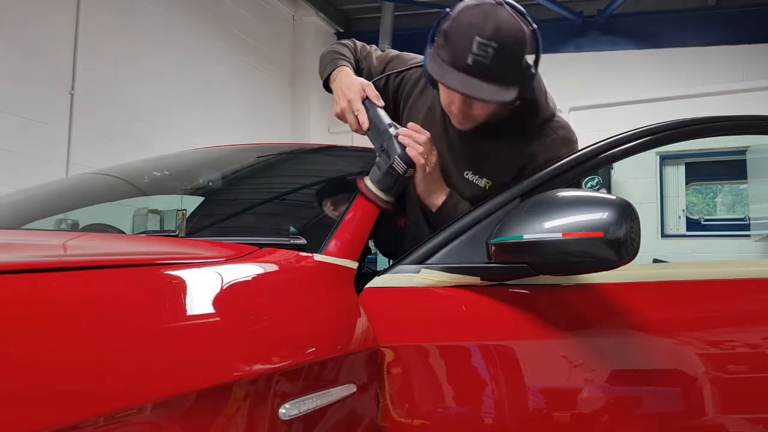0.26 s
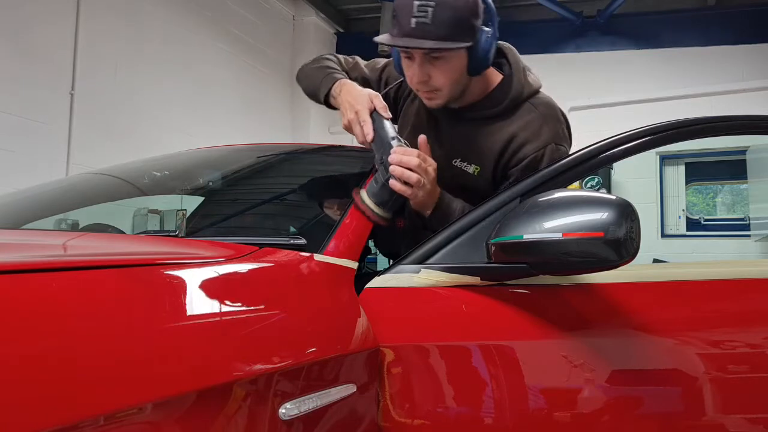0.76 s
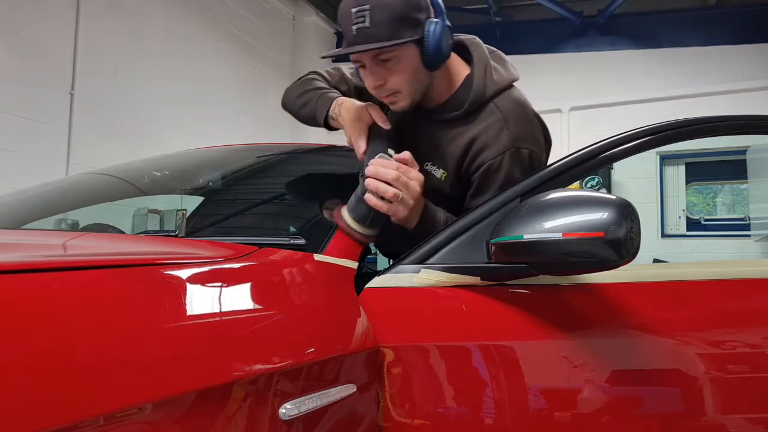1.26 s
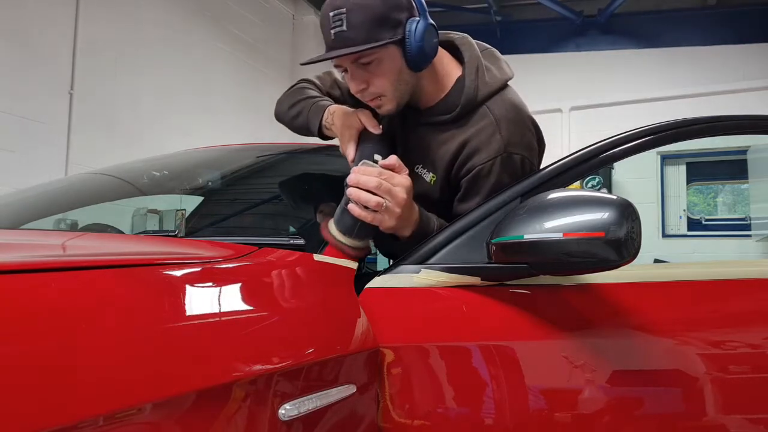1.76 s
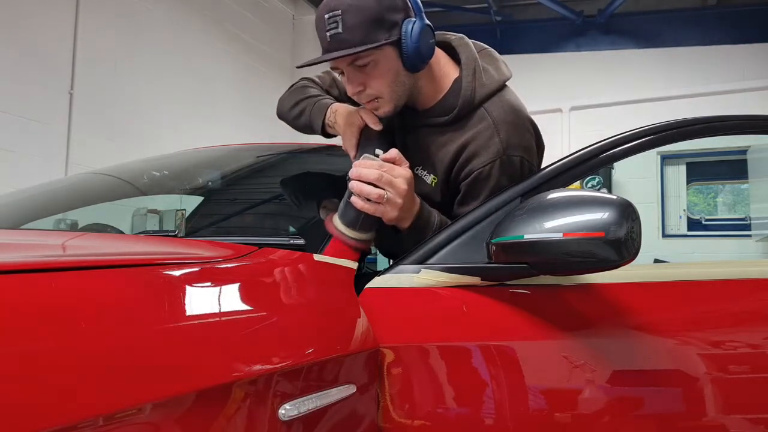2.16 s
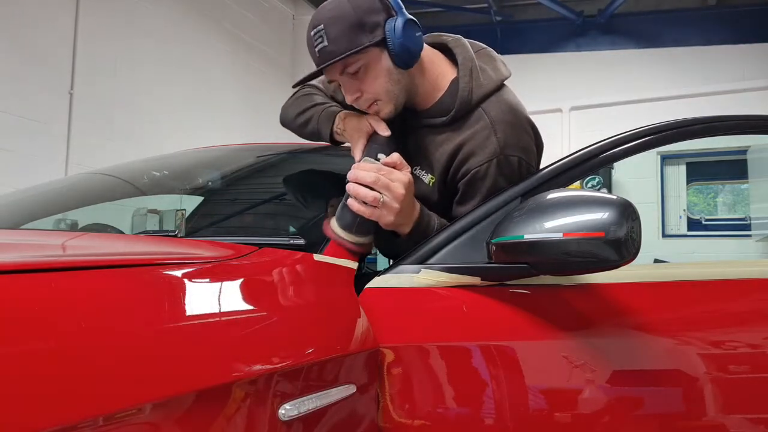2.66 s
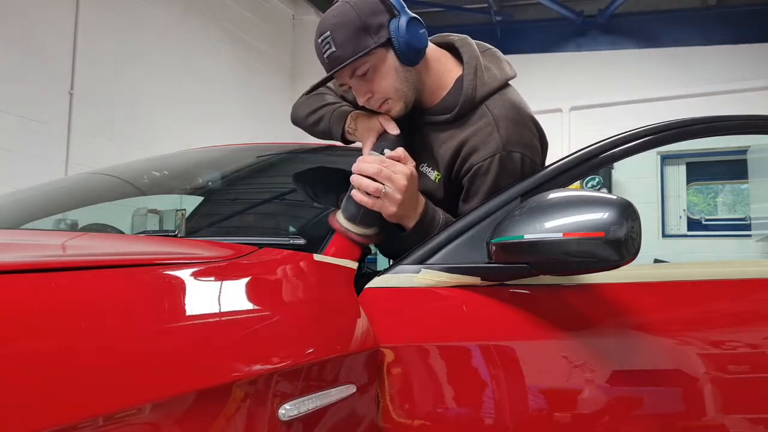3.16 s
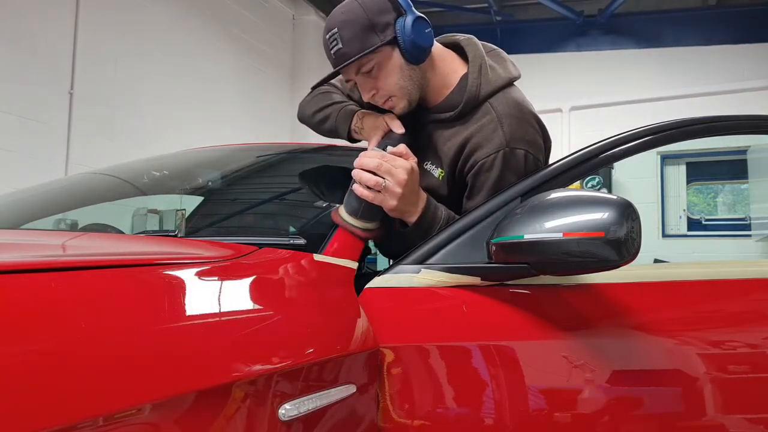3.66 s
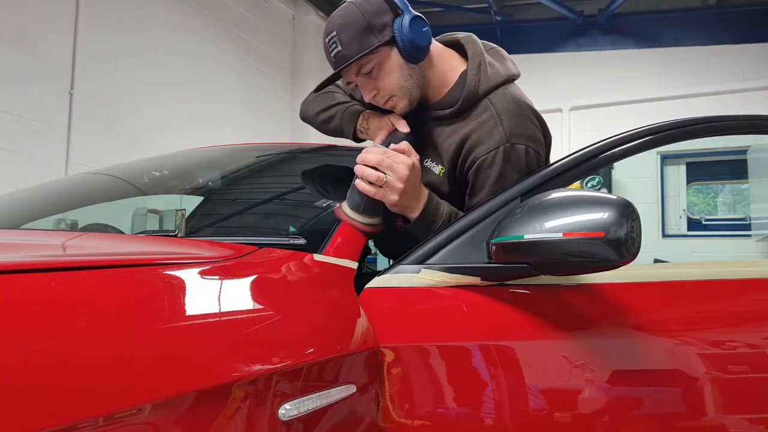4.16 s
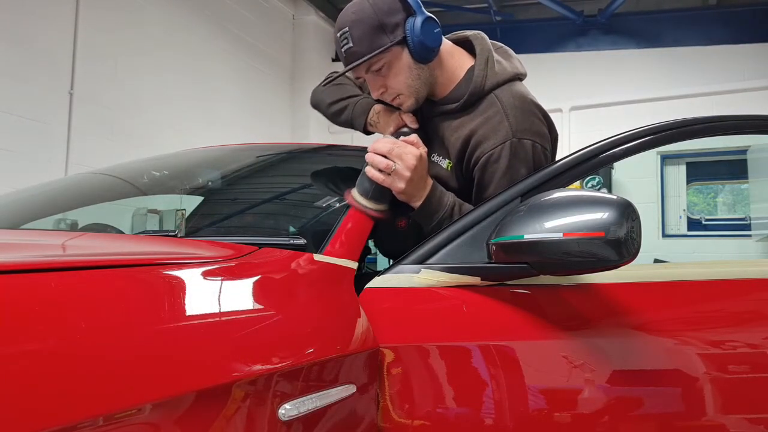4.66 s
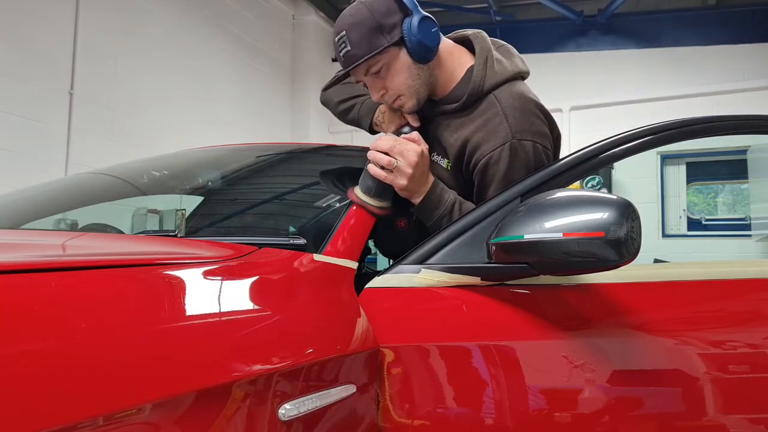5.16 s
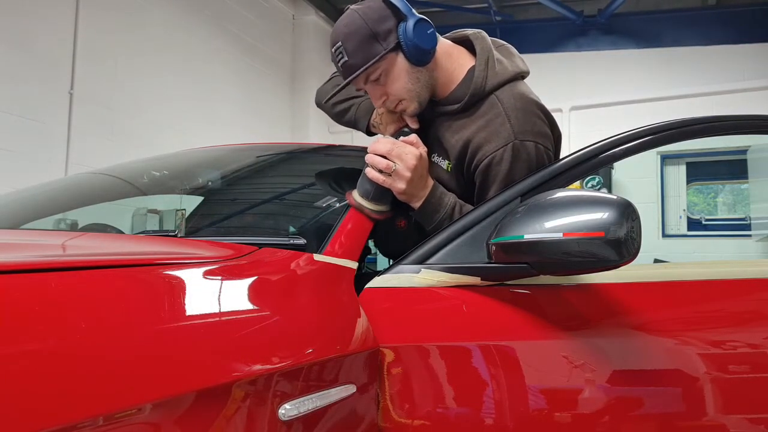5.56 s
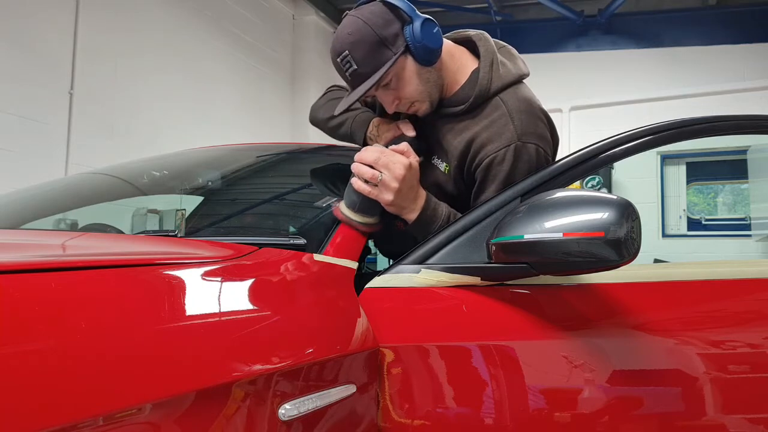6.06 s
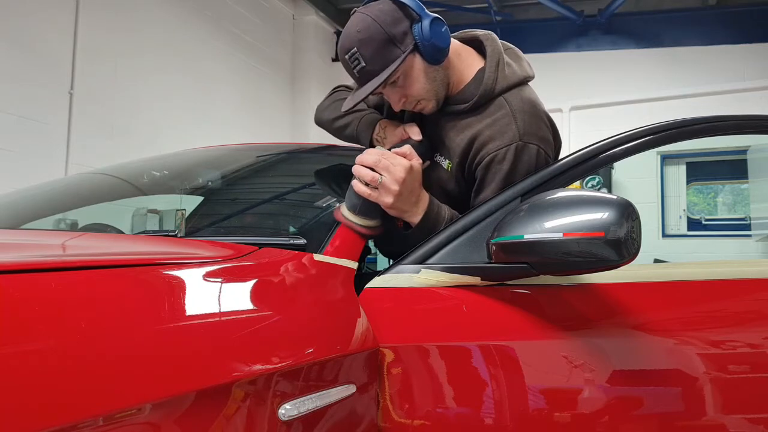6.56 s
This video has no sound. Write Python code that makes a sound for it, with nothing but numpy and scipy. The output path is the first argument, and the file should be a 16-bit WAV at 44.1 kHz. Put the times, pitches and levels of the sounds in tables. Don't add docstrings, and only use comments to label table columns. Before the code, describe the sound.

A handheld electric polisher, already running, works on a car panel in a hard-walled garage. A piercing motor whine with many steady harmonics flutters over a low pad hum, a rough gear rattle and a bright hiss of cooling air. Speed barely changes, sagging slightly toward the end. Close stereo phone pickup, a step away, loud and dense, with no pause.

```python
import sys
import numpy as np
from scipy import signal
from scipy.io import wavfile
from scipy.ndimage import uniform_filter1d

SR = 44100
rng = np.random.default_rng(int(sys.argv[2]) if len(sys.argv) > 2 else 0)


def wav_out(sig):
    wavfile.write(sys.argv[1], SR, np.round(np.clip(np.atleast_2d(sig).T, -1, 1) * 32767).astype(np.int16))


def invert_db(x):
    u = np.asarray(x, float) / 20
    return 10 ** u


N = 300321
MOTOR_HZ = 415
GEAR = 9 / 43

# (t/s, gear rattle level/dB, cooling air level/dB, air brightness/dB)
EFFORT = [(0, -23.5, -22.5, 2), (.35, -26, -23, 1), (1, -23, -24.5, 5), (1.6, -23.5, -23, 1.5),
          (2.4, -23.5, -22, -0.5), (3.2, -23, -23.5, 0.9), (4, -23, -23, 1.5), (4.8, -23, -23.5, 1),
          (5.4, -23, -24, 2), (6.1, -23.5, -22.5, -0.5), (6.81, -23, -22, -1.5)]
# (t/s, pad hum level/dB, shake level at motor speed/dB, contact lift of hum overtones/dB)
GRIP = [(0, -22, -29.5, -2), (.5, -22.5, -39.5, -1.5), (.8, -21.4, -28.5, 4.5), (1.4, -20, -24.5, 0),
        (1.8, -20, -26, 6), (2.3, -21.5, -32.5, -0.5), (2.8, -21, -31.5, 0), (3.2, -21, -34.5, -6),
        (4.1, -21, -31.5, 0), (4.9, -21.5, -35.5, 1), (6, -21.5, -33, 2.5), (6.3, -20.5, -33.5, -1.5),
        (6.81, -20.7, -37, -5)]
# (f/Hz, likeness 0..1)
SAME = [(30, .55), (130, 0.7), (290, 0.91), (640, 0.76), (1400, 0.3), (3100, 0.33), (7000, 0.28),
        (15000, 0.27)]


def evened(x):
    return x / np.sqrt(np.mean(abs(x) ** 2) + 1e-20)


def read(points, hz):
    f, value = np.transpose(points)
    return np.interp(np.log(hz + 1), np.log(f + 1), value)


def columns(rows):
    s, *rest = np.transpose(rows)
    return [np.interp(np.arange(N) / SR, s, column) for column in rest]


def wander(rate_hz, count):
    steps = N // 256 + 2
    chance = rng.standard_normal((count, steps)) + 1j * rng.standard_normal((count, steps))
    smoothing = np.exp(-(np.fft.fftfreq(steps, 256 / SR) / rate_hz) ** 2)
    slow = evened(np.fft.ifft(np.fft.fft(chance) * smoothing))
    return np.array([np.interp(np.arange(N) / 256, np.arange(steps), row) for row in slow])


def paths(hz, rate_hz, steady):
    likeness = np.clip(read(SAME, hz), 0, 1)
    a, b = wander(rate_hz, count=2)
    walls = np.array([a, likeness * a + np.sqrt(1 - likeness ** 2) * b])
    steady = np.clip(steady, 0, 1)
    return np.sqrt(steady) + np.sqrt(1 - steady) * walls


def panned(db, pan_db, likeness=1):
    right_share = 1 / (1 + invert_db(pan_db) ** 2)
    apart = np.exp(.5j * np.arccos(np.clip(likeness, -1, 1)))
    return invert_db(db) * np.sqrt(2) * np.array([np.sqrt(1 - right_share) * apart, np.sqrt(right_share) / apart])


def noise(spectrum, patchy_db, bright_db):
    # (f/Hz, level/dB)
    balance_db = [(150, -2.5), (400, -0.5), (1300, -0.3), (4000, 0.7), (15000, -1)]
    # (f/Hz, share)
    facing = [(3300, 0.13), (5200, 1), (7500, 0.39), (11000, 0.46)]
    lead = 2.01
    frames, hz = N // 256 + 5, np.fft.rfftfreq(1024, 1 / SR)
    a, b, c, d, patches = rng.standard_normal((frames, 513, 5)).T
    patches = uniform_filter1d(patches, size=10, axis=0)
    patches = evened(uniform_filter1d(patches, size=16, axis=1))
    likeness = np.clip(read(SAME, hz), 0, 1)[:, None]
    late = np.exp(-2j * np.pi * hz * lead / SR)[:, None]
    left = a + 1j * b
    right = late * (likeness * left + np.sqrt(1 - likeness ** 2) * (c + 1j * d))
    tilt_db = read(balance_db, hz)[:, None] / 2
    bright_frames = bright_db[np.minimum(np.arange(frames) * 256, N - 1)]
    level_db = read(spectrum, hz)[:, None] + np.outer(read(facing, hz), bright_frames) + patchy_db * patches
    z = np.array([left, right]) * invert_db(level_db + np.array([tilt_db, -tilt_db]))
    return evened(signal.istft(z, nperseg=1024, noverlap=768)[1][:, :N])


def cooling_air(turns):
    # (f/Hz, level/dB)
    air_colour = [(600, -34), (1500, -5), (2000, -4.5), (2600, -0.5), (3300, -3), (5000, -1), (6500, -3.5),
                  (7600, -4), (8600, -13), (9500, -9.5), (12200, -7), (14000, -10.5), (15150, -3.5),
                  (15400, -16.5)]
    chop = 1 + 0.024 * np.cos(2 * np.pi * turns) + 0.062 * np.cos(2 * np.pi * GEAR * turns)
    eddies_db = 0.69 * evened(uniform_filter1d(rng.standard_normal(N), size=70))
    _, air_db, bright_db = columns(EFFORT)
    return invert_db(air_db + 7.0 + eddies_db) * chop * noise(air_colour, patchy_db=0.91, bright_db=bright_db)


def resonate(x, hz, width_hz):
    turn = np.exp(2j * np.pi * np.cumsum(hz * np.ones(N)) / SR)
    r = np.exp(-np.pi * width_hz / SR)
    return 2 * (turn * signal.lfilter([1 - r], [1, -r], x / turn)).real


def gear_rattle(turns):
    # (f/Hz, level/dB)
    slap_colour = [(30, -24), (60, -6), (72, -9.5), (125, -13), (200, -20), (238, -19.5), (262, -8.5),
                   (500, -10), (720, -5.5), (980, -2), (1300, -6), (1900, -10), (3500, -38)]
    # (t/s, f/Hz)
    case_hz = [(0, 1150), (.5, 1050), (1.1, 1004), (2.3, 900), (3.5, 940), (4.6, 925), (5.8, 970),
               (6.81, 990)]
    # (f/Hz, width/Hz, ring level/dB)
    fixed_rings = [(642, 12, -3), (703, 19, -2), (765, 30, -2.5), (1033, 20, -11), (1150, 40, -4),
                   (1443, 45, -7)]
    throb = 1 + 0.096 * np.cos(2 * np.pi * GEAR * turns + 0.84)
    slap = noise(slap_colour, patchy_db=0.57, bright_db=np.zeros(N))
    rings = invert_db(1) * resonate(slap, columns(case_hz)[0], width_hz=73)
    for hz, width_hz, db in fixed_rings:
        rings += invert_db(db) * resonate(slap, hz, width_hz)
    return invert_db(columns(EFFORT)[0] + 2.17) * throb * evened(slap + rings)


def pad_hum(turns):
    # (multiple of pad speed, level/dB)
    pad_orders = [(2, -47), (3, -42.5), (4, -48.5)]
    hum_db, _, contact_db = columns(GRIP)
    angle = 2 * np.pi * GEAR * turns
    spin = (wander(1.0, count=1) * np.exp(.14j * angle)).real
    side_db, side_phase = np.array([[.3], [-.3]]), np.array([[.4], [.15]])
    out = np.sqrt(2) * invert_db(hum_db + side_db) * (1 + .06 * spin) * np.cos(angle + side_phase)
    for k, db in pad_orders:
        overtone = (paths(k * GEAR * MOTOR_HZ, 3.3, 0.71) * np.exp(1j * k * angle)).real
        out += np.sqrt(2) * invert_db(db + contact_db) * (1 + .6 * spin) * overtone
    return out


def swelling(k, rows, between_db):
    t, t_all = np.arange(0, N + 256, 256) / SR, np.arange(N) / SR
    shapes = [np.exp(-np.log(2) * (2 * abs(t - s) / length) ** 3) for s, length, *_ in rows]
    firm = sum(shape * panned(*row[2:])[:, None] for shape, row in zip(shapes, rows))
    firm = np.array([np.interp(t_all, t, side) for side in firm])
    cover = np.interp(t_all, t, np.minimum(sum(shapes), 1))
    echoes = paths(k * MOTOR_HZ, k / 4 + 1, 0)
    flutter = .15 if k < 10 else .4
    return firm * (1 + flutter * echoes) + invert_db(between_db) * (1 - cover) * (0.66 + 0.54 * echoes)


def tone(k, angle, gains):
    phase = ((k * angle + 2 * np.pi * rng.random()) % (2 * np.pi)).astype(np.float32)
    return np.sqrt(2) * (gains.real * np.cos(phase) - gains.imag * np.sin(phase))


def motor(turns):
    # (multiple of motor speed, level/dB)
    motor_orders = [(4, -41.9), (10, -37.9), (11, -41.1), (13, -37.8), (14, -38.9), (15, -42.0),
                    (16, -44.5), (17, -41.8), (19, -45.8), (26, -47.6), (27, -48.7), (28, -44.4),
                    (29, -46.3), (31, -46.8), (32, -47.0), (33, -41.9), (34, -43.3), (35, -46.7)]
    # (middle t/s, length/s, level/dB, left-right level/dB, phase likeness -1..1)
    swells_2 = [(0, 0.24, -30, 3, 1), (1.75, 1.8, -30.5, -7, 0.63), (3.1, 0.48, -30.5, 2, 1),
                (3.65, .5, -32.5, 3, 1), (4.25, 0.43, -31.5, 3, 1), (4.85, 0.6, -30.5, 6, 1),
                (5.9, 1.4, -30, 5, 1)]
    swells_3 = [(.4, .5, -32.5, 0, .6), (3.2, 1.5, -32, 0, .6), (4.45, 0.54, -33, 0, .6),
                (6.45, 0.5, -31, 0, .6)]
    swells_5 = [(.35, 0.26, -36, 0, .6), (2.65, 0.56, -33, 0, .6), (3.7, 0.33, -32, 0, .6),
                (5.3, 0.63, -34, 0, .6)]
    swells_6 = [(.5, .2, -28.5, 1, .8), (1.57, .28, -24.5, 6, .95), (2.05, 0.25, -26, -2, .9),
                (2.7, 0.28, -24.5, -3, 0.82), (3.5, 0.88, -27.5, -9, .3), (4.4, .5, -24, -3, .9),
                (5.05, .26, -23, 6, .7), (5.47, .4, -26, 16, 0.56), (5.89, .14, -22, 10, .7),
                (6.22, 0.22, -26, -13, .8), (6.62, 0.33, -25.5, -8, .5)]
    swells_7 = [(.35, 0.33, -29.5, 0, .9), (1.4, 1, -35, 4, 1), (2.3, 0.71, -34, 7, 0.55),
                (2.8, 0.18, -31, -6, .9), (4.1, 0.54, -30.5, -6, 0), (5.1, .45, -31, 8, .4),
                (5.82, 0.18, -27.5, -1, 0.97), (6.35, 0.36, -25.5, 8, .7), (6.8, 0.29, -27, -1, 0)]
    swells_8 = [
        (2.15, .3, -34, 0, .5),
        (5, 1, -35, 0, 0.65),
        (6.3, 1, -34, 0, .6),
    ]
    swells_9 = [(.6, .2, -38, 0, .5), (.97, 0.19, -27.5, 0, .5), (1.4, 0.27, -33, 0, .3),
                (2.4, 0.31, -36.5, 0, .3), (4.8, .25, -34, 0, .3), (5.2, .25, -39, 0, .3)]
    swells_12 = [(.42, .18, -32, 0, .3), (1, .3, -33, 0, .3), (3.65, .5, -34, 0, .3),
                 (5.85, 0.54, -29.5, 0, .3)]
    swells_18 = [
        (.9, 1.6, -33, 0, 0),
        (2, .6, -38, 0, 0),
        (3.9, 0.8, -36, 0, 0),
        (6.6, .5, -31.5, 0, 0.37),
    ]
    swells_24 = [(.2, 0.24, -29, 0, -.3), (1.65, .5, -38, 0, -.3), (2.4, .6, -30, 0, -.3),
                 (3.15, 0.79, -29.5, 0, -0.34), (3.9, 0.35, -27.5, 0, -0.2), (5.2, .2, -32, 0, -.3),
                 (6, .6, -32.5, 0, -.3)]
    swells_30 = [(.4, .3, -27.5, 8, .8), (1.1, .45, -26, -4, -0.85), (2.2, .3, -28, -6, .7),
                 (3.15, .45, -26.5, -4, -.3), (3.95, 0.38, -26, -3, 0.55), (4.6, 0.24, -27, -10, -.4),
                 (5.6, .3, -31, -4, 0), (6.4, .25, -33, -1, 0)]
    swells_36 = [(.62, 0.5, -22, -4, -.3), (1.375, 0.083, -19, -6, 0.43), (1.68, 0.38, -22.5, -2, -0.75),
                 (2, .12, -20, 6, -0.63), (2.25, .12, -21, -1, -.9), (2.69, 0.21, -21, 0, .9),
                 (3.6, 0.32, -20, -8, -.3), (4.35, 0.15, -17, -2, -0.43), (4.75, .12, -21.6, -2, 0),
                 (5.125, 0.15, -20.5, -17, -.9), (5.52, 0.33, -17, -11, .7), (5.88, .12, -25, -14, .7),
                 (6.5, .14, -21.4, 0, -.2)]
    loud_orders = {2: swells_2, 3: swells_3, 5: swells_5, 6: swells_6, 7: swells_7, 8: swells_8,
                   9: swells_9, 12: swells_12, 18: swells_18, 24: swells_24, 30: swells_30, 36: swells_36}
    between_levels = [-37.5, -37, -42, -34, -37, -36, -36.5, -36.5, -37, -37, -30.5, -27]
    pad = 2 * np.pi * GEAR * turns
    angle = 2 * np.pi * turns + .01 * np.sin(pad) + .004 * np.sin(2 * pad)
    shake = panned(columns(GRIP)[1], np.full(N, 5.5))
    out = tone(1, angle, shake * paths(MOTOR_HZ, 0.82, 0.91))
    for (k, rows), db in zip(loud_orders.items(), between_levels):
        out += tone(k, angle, swelling(k, rows, db))
    for k, db in motor_orders:
        out += tone(k, angle, invert_db(db) * paths(k * MOTOR_HZ, k / 4 + 1, .15))
    return out


def scene():
    # (t/s, motor speed f/Hz)
    speed = [(0, 414.15), (.625, 418.76), (.875, 419.35), (1.125, 418.66), (1.5, 419.03), (1.875, 418.23),
             (2.125, 416.17), (2.375, 415.85), (2.875, 413.51), (3.25, 413.74), (3.875, 415.3),
             (4.125, 415.17), (4.375, 414.05), (4.75, 413.3), (5.125, 414.0), (5.625, 413.29),
             (6.125, 410.97), (6.81, 410.6)]
    turns = np.cumsum(columns(speed)[0]) / SR
    return cooling_air(turns) + gear_rattle(turns) + pad_hum(turns) + motor(turns)


def low_pass(x):
    return signal.sosfilt(signal.butter(12, 16230, fs=SR, output="sos"), x)


def record(dry):
    # (from f/Hz, to f/Hz, share of time dropped/%)
    faint_bands = [(180, 245, 24), (8300, 8600, 14), (8600, 9000, 10), (13300, 13600, 14),
                   (13900, 14300, 12), (15200, 15350, 80), (15350, 15500, 88)]
    hz, _, z = signal.stft(np.clip(dry, -1, 1), SR, nperseg=2048)
    for low_hz, high_hz, share in faint_bands:
        band = (hz > low_hz) & (hz <= high_hz)
        power = uniform_filter1d((abs(z[:, band]) ** 2).sum((0, 1)), size=3)
        z[:, band] *= power > np.percentile(power, share)
    z[:, hz > 15500] = 0
    mix = signal.istft(z, SR, nperseg=2048)[1][:, :N]
    return low_pass(mix)


dry = scene()
out = record(dry)
wav_out(out)
```